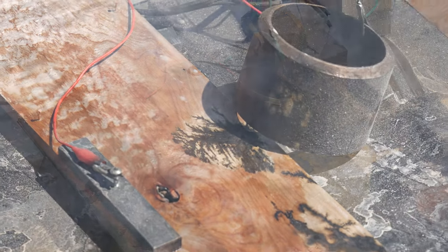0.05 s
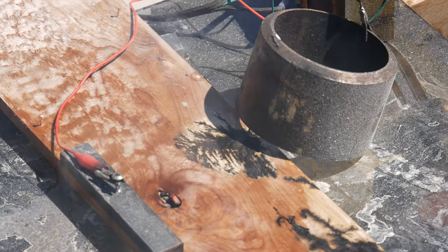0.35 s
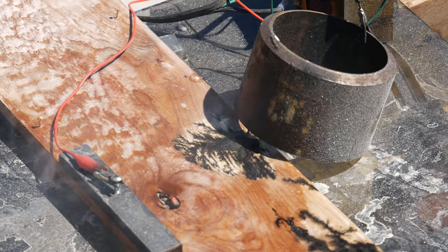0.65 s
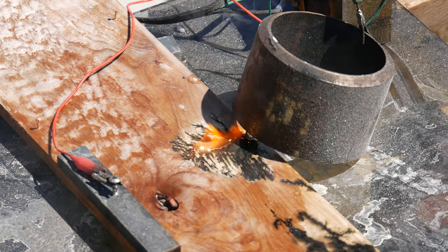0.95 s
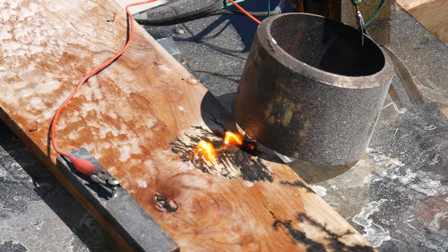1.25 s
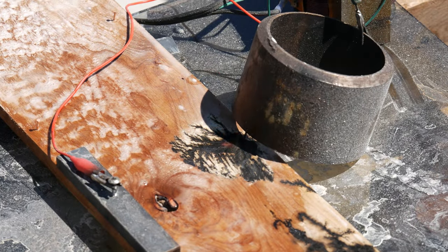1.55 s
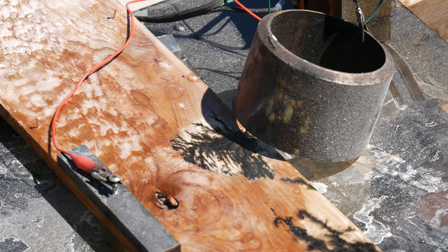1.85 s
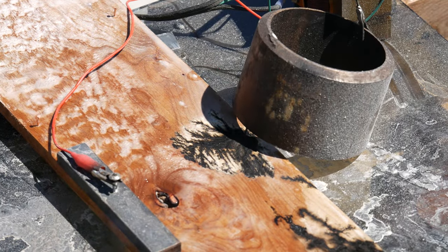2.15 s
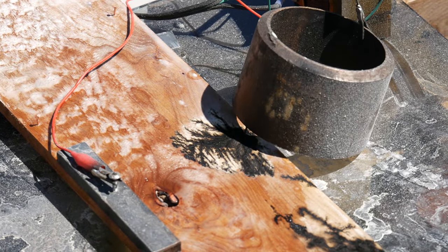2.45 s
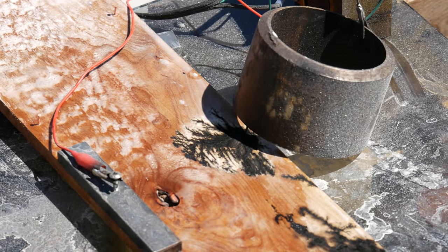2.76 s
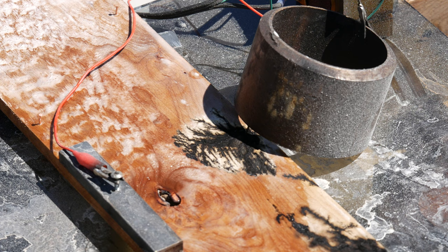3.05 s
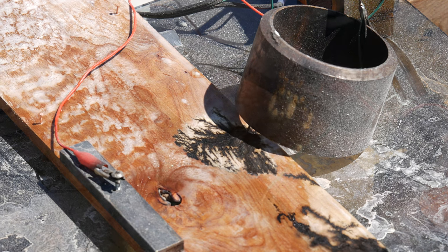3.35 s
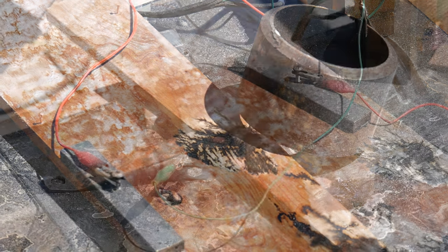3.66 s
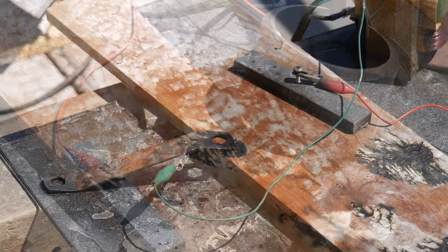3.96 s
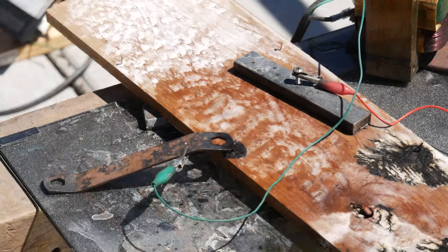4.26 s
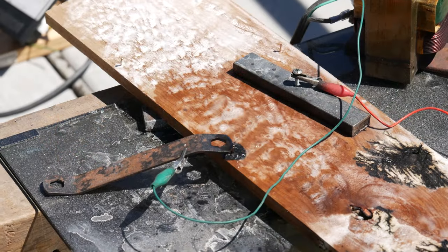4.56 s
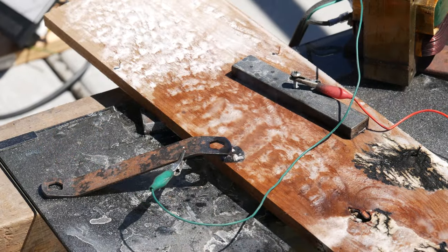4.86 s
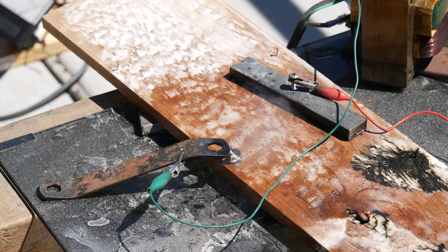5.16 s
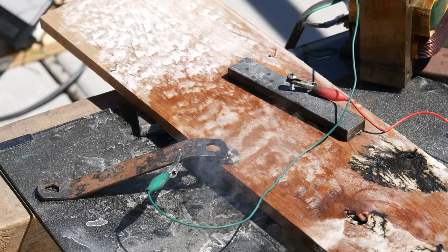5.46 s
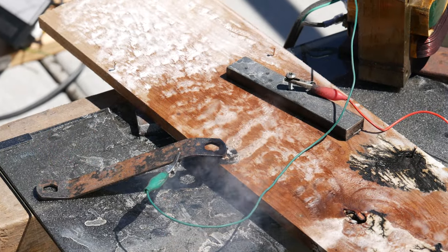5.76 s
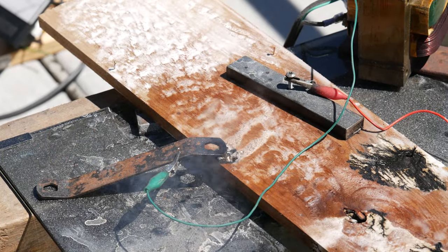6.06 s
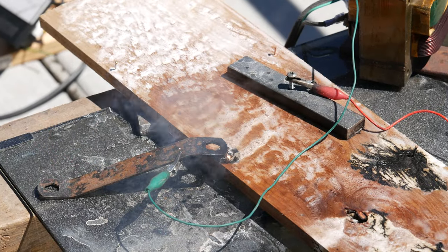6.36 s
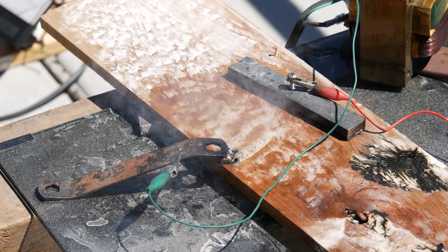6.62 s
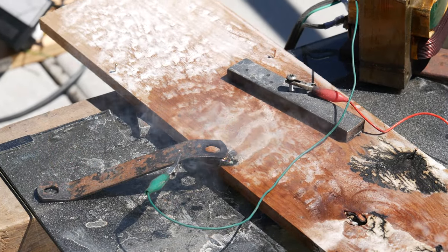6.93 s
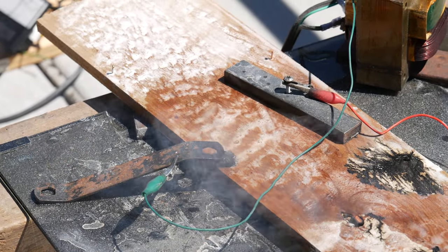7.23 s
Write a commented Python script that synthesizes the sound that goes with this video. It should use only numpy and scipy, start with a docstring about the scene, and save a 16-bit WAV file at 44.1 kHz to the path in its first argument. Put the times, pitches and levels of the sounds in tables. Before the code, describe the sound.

High voltage burns a wet board outdoors, first faintly, then with a bright, squeaky, pulsing sizzle between two sharp switch clicks, over distant traffic.

```python
"""Outdoors, at a wet wooden board: high voltage burns branching tracks into the wood.
A switch snaps the current on and off. The arc sizzles on every half cycle of the mains, spits, and
boils off steam that squeaks through pores. Behind it: open air, traffic, a low drone, far birds and
soft bumps on the microphone. Heard from two spots in turn, the first wide, the second centred."""
import sys
import numpy as np
from scipy import signal
from scipy.fft import rfft, irfft, next_fast_len
from scipy.io import wavfile
from scipy.ndimage import uniform_filter1d, map_coordinates

SR = 44100
rng = np.random.default_rng(int(sys.argv[2]) if len(sys.argv) > 2 else 0)


def persist_wave(psi):
    """Save psi, clipped to +-1, as 16-bit WAV."""
    counts = np.round(np.clip(psi, -1, 1) * 32767).astype(np.int16)
    wavfile.write(sys.argv[1], SR, np.atleast_2d(counts).T)


N = 330309
TIME = np.arange(N) / SR

MAINS_HZ, STRIKE_S = 60, 4.6778  # STRIKE_S: one voltage peak
ON_S, CAUGHT_S, DRIES_S, OFF_S = 4.655, 4.78, 5.18, 7.19  # stages of the strong burn

# Arc spectrum: freq_hz, level_db
ARC_SPECTRUM = [(1500, -13), (3000, 3.5), (4300, -6), (6000, 5), (8000, 3), (9800, 3.5), (11200, -4.5),
                (12800, -9.5), (14500, -13.5), (16000, -15)]
# Narrow high resonances that colour the sizzle and pitch its squeaks: pitch_hz, width_hz, level_db
SIZZLE_MODES = [(5820, 114, -14), (6360, 220, -14), (7070, 96, -2), (7300, 67, -7.5), (8350, 85, -13),
                (8780, 102, -11), (9580, 138, -2), (10550, 150, -6), (11000, 150, -9), (12900, 90, -27),
                (14620, 134, -14)]
# Flares on reaching fresh wood: start_s, level_db, attack_s, t60_s
FLARES = [(5.208, -26.5, 0.0094, 0.091), (5.35, -38, 0.016, 0.27), (5.45, -42, 0.015, .8),
          (5.907, -37, 0.01, 0.97), (6.81, -44, 0.024, 4.2)]


def strong_arc(dry_db=-41.5, wet_boost_db=11.5, drying_s=.2, fade_db_per_s=2, catch_db=2):
    """Micro-sparks fry each half cycle: pulsing harder when wet, squeakier and brighter when strong."""
    wetness = np.exp(-elapsed(DRIES_S) / drying_s)
    strength = undb(dry_db + wet_boost_db * wetness - fade_db_per_s * elapsed(DRIES_S))
    for s, db, attack_s, t60_s in FLARES:
        strength = np.hypot(strength, undb(db) * envelope(s, attack_s, s + attack_s, t60_s))
    vigour = np.clip((20 * np.log10(strength) - dry_db) / wet_boost_db, 0, 1)
    squeak_db = np.interp(vigour, [0, 1], [-14, 5.5])
    sheen_db = np.interp(vigour, [0, 1], [1.5, 11.5])
    fry = colour(grains(spread_db=3.5), ARC_SPECTRUM)
    fry = unit(fry + undb(-1) * ring(fry, SIZZLE_MODES))
    fry = bell(fry, 12700, 3300, sheen_db) + undb(squeak_db) * squeaks(SIZZLE_MODES)
    fry = patchy(fry, depth_db=2.6, rate_hz=65, width_hz=450)
    fry = fry * restrikes(2 * MAINS_HZ, STRIKE_S, depth_db=2 + 2.5 * wetness, scatter_db=.5)
    fry = fry / np.sqrt(uniform_filter1d(fry ** 2, SR // 5))  # running rms of 1
    catching = undb(np.interp(TIME, [ON_S, CAUGHT_S], [-catch_db, 0]))
    flutter = undb(.5 * walk(45))
    return fry * strength * catching * flutter * envelope(ON_S, .014, OFF_S, t60_s=.12)


# Faint burn strength: time_s, level_db
FAINT_LEVELS = [(0.92, -60), (1.005, -56), (1.13, -60.5), (1.215, -60), (1.228, -53.5), (1.33, -57),
                (1.36, -69), (1.41, -53)]
# Faint burn spectrum: freq_hz, level_db
FAINT_SPECTRUM = [(2940, -5), (5000, -12), (6070, -15.5), (9470, -3), (10300, -8), (13100, -2),
                  (14800, -11), (15500, -28)]
# Vapour squeaks: pitch_hz, width_hz, level_db
FAINT_MODES = [(7050, 150, -15), (9580, 153, -8), (11850, 250, 0), (12850, 200, -4), (13400, 200, -7)]


def faint_arc(dying_db=-61.5, dying_t60_s=.6):
    """Thin sizzle: a dying burn strikes once per mains cycle, then a weak one twice per cycle."""
    fizz = unit(colour(grains(spread_db=3), FAINT_SPECTRUM)) + undb(-3) * squeaks(FAINT_MODES)
    dying = unit(fizz * restrikes(MAINS_HZ, strike_s=.011, depth_db=9, scatter_db=2))
    burning = unit(fizz * restrikes(2 * MAINS_HZ, strike_s=.9246, depth_db=4, scatter_db=1.8))
    return (dying * undb(dying_db - 60 * TIME / dying_t60_s)
            + burning * undb(curve(FAINT_LEVELS)) * during(FAINT_LEVELS, fade_s=.035))


def restrikes(rate_hz, strike_s, depth_db, scatter_db):
    """Gain of an arc restriking at voltage peaks, each burst its own size."""
    cycle = rate_hz * (TIME - strike_s) + 1 / 2
    size_db = scatter_db * noise()[np.floor(cycle).astype(int)]
    return undb(size_db * np.sin(np.pi * cycle) ** 2 - depth_db * np.cos(2 * np.pi * cycle))


def squeaks(modes, flutter_db=5, wander=.005):
    """Vapour whistles through pores: rough tones that drift together, and come and go."""
    out, drift = 0, 1 + wander * walk(60)
    for hz, width_hz, db in modes:
        pitch_hz = hz * drift + width_hz * walk(900)
        out = out + undb(db + flutter_db * walk(130)) * tone(pitch_hz)
    return unit(out)


def patchy(x, depth_db, rate_hz, width_hz):
    """Pores open and close: bands of a hiss swell and drop out independently."""
    hz, s, bands = signal.stft(x, SR, nperseg=256)
    grid = np.meshgrid(hz / width_hz, s * rate_hz, indexing="ij")
    levels = map_coordinates(rng.standard_normal((64, 1024)), grid, order=1, mode="mirror")
    return unit(signal.istft(bands * undb(depth_db * unit(levels)), SR)[1][:N])


# Sap bursts: start_s, peak_db, highpass_hz, t60_s
SPITS = [(.029, -57, 5200, .01), (.112, -72, 5200, .01), (1.008, -43, 2500, .008), (1.974, -40, 4600, .04),
         (1.996, -38, 4400, .03), (4.693, -18, 5600, .014), (5.908, -14.5, 6000, .009),
         (5.9442, -22, 6800, 0.012)]


def spits(ring_db=10, rise_s=.00069):
    """Pockets of sap burst: a bright crack with a short ring."""
    t, out = TIME[:SR // 25], np.zeros(N)
    for s, db, highpass_hz, t60_s in SPITS:
        crack = highpass(noise(len(t)) * undb(-60 * t / t60_s), highpass_hz, order=3)
        crack = band(band(crack, 4600, 5200), 8400, 7000) * (1 - np.exp(-t / rise_s))
        crack = crack + undb(ring_db) * ring(crack, SIZZLE_MODES)
        add(out, s, at_peak(crack, db))
    return out


# Steam hiss spectrum: freq_hz, level_db
STEAM_SPECTRUM = [(2350, -42), (4000, -12), (4990, -10), (5850, -4.5), (10700, -4.5), (12400, -1),
                  (14300, -7), (15200, -31), (15500, -53)]
# Steam whistles: pitch_hz, width_hz, level_db
STEAM_MODES = [(5660, 130, -1), (6700, 200, -2), (8040, 150, 1), (9050, 110, 1), (11900, 260, 5),
               (12800, 260, 3)]


def steam(start_s=1.966, end_s=2.416, hold_db=-55.5, burst_db=9, settle_s=.11):
    """A hissing, whistling jet bursts from the hot track, settles, holds and dies away."""
    hiss = unit(colour(noise(), STEAM_SPECTRUM)) + undb(-6.5) * squeaks(STEAM_MODES)
    hiss = patchy(hiss, depth_db=2.3, rate_hz=30, width_hz=400)
    db = hold_db + burst_db * np.exp(-elapsed(start_s) / settle_s) + walk(60)
    return hiss * undb(db) * envelope(start_s, .0099, end_s, t60_s=.35)


# Spurt whistles: pitch_hz, width_hz, level_db
SPURT_MODES = [(8600, 140, -5), (9680, 104, -5), (10400, 140, -1.5), (11100, 120, -5), (11600, 260, 0),
               (12200, 130, -13), (13850, 160, -14)]


def spurt(level_db=-44):
    """The arc breaks into wet wood again; steam whistles out, pulsing with the current."""
    whistling = unit(squeaks(SPURT_MODES) * restrikes(2 * MAINS_HZ, STRIKE_S, depth_db=3, scatter_db=2))
    return whistling * undb(level_db) * envelope(start_s=5.9, attack_s=.04, end_s=6.03, t60_s=.6)


def sputter(count=22, low_hz=5600, high_hz=7300, length_s=.007, glide=.03, level_db=-33.5, scatter_db=2):
    """On wet wood, some bursts blow a tiny squeal through a fresh pore, each at its own pitch."""
    when, pitch, bend, size = rng.random((count, 4)).T
    half_cycle = np.round((CAUGHT_S + when * (DRIES_S - CAUGHT_S) - STRIKE_S) * 2 * MAINS_HZ)
    start_s = STRIKE_S + half_cycle / (2 * MAINS_HZ) - length_s / 2
    start_hz = low_hz + pitch * (high_hz - low_hz)
    end_hz = start_hz * (1 + glide * (2 * bend - 1))
    db = level_db + scatter_db * (2 * size - 1)
    return glides(zip(start_s, np.full(count, length_s), start_hz, end_hz, db), jitter_hz=50)


# Vapour squeals: start_s, length_s, start_hz, end_hz, level_db
SQUEALS = [(2.09, .1, 5640, 5700, -64), (2.28, .06, 5720, 5660, -66), (4.836, .022, 6480, 6520, -34),
           (4.868, 0.016, 9650, 9700, -30), (4.89, .08, 5400, 5430, -40), (5.014, 0.015, 6860, 6830, -30),
           (5.06, .016, 5900, 5900, -32), (5.098, .012, 9700, 9760, -39), (5.215, 0.0154, 6800, 6730, -32),
           (5.256, .011, 9680, 9620, -33), (5.305, 0.011, 9650, 9600, -29.5),
           (5.366, 0.011, 7150, 7080, -36), (5.375, .025, 8400, 8900, -39), (5.44, .045, 11800, 12150, -45),
           (5.472, .01, 6560, 6500, -38), (6.012, .014, 10450, 10400, -37), (6.83, .012, 5650, 5600, -41),
           (6.855, .014, 7230, 7170, -40)]


def squeals():
    """Single squeals of escaping vapour."""
    return glides(SQUEALS, jitter_hz=60)


# Switch throws: start_s, rise_s, snap_s, hold_s, slide_db, snap_db, tail_db,
# highpass_hz, treble_db, sheen_db
THROWS = [(0.857, .005, 0.8745, 0.0045, -39.5, -30, -38, 1430, -8, 8),
          (1.434, .007, 1.446, 0.012, -34, -31, -41.5, 1310, -6.5, 10.5),
          (4.623, .014, 4.642, 0.0016, -14.5, -10.5, -20.5, 1430, 2.5, 0),
          (7.206, .001, 7.221, 0.0028, -11.5, -6, -30, 2150, 17, -17)]
# Contact rattle spectrum: freq_hz, level_db
RATTLE_SPECTRUM = [(710, -65), (1200, -3.5), (1420, 0.5), (1760, -0.5), (3350, -3.5), (3810, 0.5),
                   (4770, -2.5), (6800, -2.5), (7570, -2), (9170, 2), (11700, -14), (14100, -19),
                   (15500, -29)]
# Housing resonances: pitch_hz, width_hz, level_db
HOUSING_MODES = [(2100, 160, -5.5), (2500, 43, -4.5), (3960, 240, -2.5), (4200, 300, -2), (5280, 110, -6),
                 (6900, 70, -3), (8250, 98, 1), (9000, 130, -8.5), (9300, 190, 2)]
# Ringing after a snap: pitch_hz, level_re_snap_db, t60_s
SNAP_RINGS = [(1780, -25, .12), (1990, -28, 0.12), (2487, -22, 0.13), (3830, -17.5, 0.13),
              (4120, -20.5, 0.18), (4540, -27, .17), (5400, -22, 0.16), (9110, -25, 0.14)]


def switch(snap_t60_s=.066, tail_t60_s=.19):
    """The contact scrapes, snaps home and rattles; the housing rings, the yard returns a short tail."""
    t, out = TIME[:SR // 3], np.zeros(N)
    rattle = colour(grains(spread_db=2), RATTLE_SPECTRUM)
    rattle = unit(rattle + ring(rattle, HOUSING_MODES))
    treble = highpass(rattle, 3900, order=1)
    sheen = steep_band(rattle, 12300, 2900)
    for s, rise_s, snap_s, hold_s, slide_db, snap_db, tail_db, highpass_hz, treble_db, sheen_db in THROWS:
        since_snap = t - (snap_s - s)
        decay_s = np.maximum(since_snap - hold_s, 0)
        slide = undb(slide_db) * (1 - np.exp(-t / rise_s))
        snap = undb(snap_db - 60 * decay_s / snap_t60_s)
        tail = undb(tail_db - 60 * decay_s / tail_t60_s)
        gain = np.where(since_snap < 0, slide, np.hypot(snap, tail))
        span = slice(int(s * SR), int(s * SR) + len(t))
        body = rattle[span] + (undb(treble_db) - 1) * treble[span] + undb(sheen_db) * sheen[span]
        body = unit(highpass(body, highpass_hz, order=3))
        add(out, s, body * gain[:len(body)])
        for hz, db, t60_s in SNAP_RINGS:
            ringing = unit(steep_band(noise(len(t)), hz, width_hz=340))
            add(out, snap_s, ringing * undb(snap_db + db - 60 * t / t60_s))
    return highpass(out, 600, order=2)


# Lever and clamp ticks: start_s, peak_db, pitch_hz, second_hz, second_db, t60_s
TICKS = [(0.846, -43, 2200, 11300, -4, .014), (1.421, -27.5, 2390, 3340, -4, 0.029),
         (3.769, -16.5, 2710, 6000, -8.5, 0.008), (3.77, -25.5, 7300, 8400, -11, 0.0047),
         (3.811, -29.5, 3400, 8200, -10, 0.0066), (3.819, -33, 5300, 8100, -8, 0.011),
         (3.876, -34.5, 7880, 13200, -20, 0.021), (3.939, -25, 1760, 2360, -8, 0.025),
         (3.941, -35, 569, 460, -6, .15), (3.956, -29, 1720, 2200, 1, 0.017),
         (4.612, -18.5, 2360, 9100, -5, 0.021), (7.191, -11, 2410, 2140, -2, 0.038)]


def ticks(crack_db=-24, crack_t60_s=.012, contact_s=.00078):
    """Switch lever and clamps tick: two short modes over a crack of noise."""
    t, out = TIME[:SR // 12], np.zeros(N)
    for s, db, hz, second_hz, second_db, t60_s in TICKS:
        modes = np.sin(2 * np.pi * hz * t) + undb(second_db) * np.sin(2 * np.pi * second_hz * t)
        crack = steep_band(noise(len(t)), 5300, 6000) * undb(crack_db - 60 * t / crack_t60_s)
        onset = 1 - np.exp(-(t / contact_s) ** 2)
        tick = (modes * undb(-60 * t / t60_s) + crack) * onset
        add(out, s, at_peak(tick, db))
    return out


# Microphone bumps: start_s, peak_db, pitch_hz, swell_s
BUMPS = [(0.646, -42, 230, .0056), (1.799, -27.5, 160, .008), (1.851, -32.5, 150, 0.0083),
         (2.374, -40, 130, .007), (2.436, -34, 125, .018), (2.462, -31, 250, 0.0062),
         (2.484, -23.5, 175, 0.0057), (2.658, -33, 165, 0.0076), (2.717, -27.5, 200, 0.0046),
         (3.3, -38.5, 181, 0.0083), (3.417, -41, 179, 0.0077), (4.574, -22, 193, 0.0068),
         (4.578, -18.5, 383, 0.0033), (6.792, -28, 179, .007)]


def bumps(roughness=.14):
    """Soft bumps on the microphone: dull thuds of a few swings."""
    t, out = TIME[:SR // 12], np.zeros(N)
    for s, db, hz, swell_s in BUMPS:
        age = t / swell_s
        rumble = unit(steep_band(noise(len(t)), 1.5 * hz, hz))
        thud = (np.sin(2 * np.pi * hz * t) + roughness * rumble) * age ** 2 * np.exp(-age ** 2)
        add(out, s, at_peak(thud, db))
    return highpass(out, 80, order=2)


def buffet(start_s=2.296, swell_s=.19, level_db=-46):
    """A puff of air rumbles on the microphone."""
    rumble = unit(highpass(steep_band(noise(), 170, 260), 80, order=2))
    return rumble * undb(level_db) * envelope(start_s, swell_s, start_s + swell_s, t60_s=.5)


def drone(start_s=5.85, start_hz=120.6, climb_hz_per_s=23.2, level_db=-42.5):
    """A low tone swells, climbs and recedes, like a far engine pulling away."""
    hum = unit(tone(start_hz + climb_hz_per_s * elapsed(start_s)))
    return hum * undb(level_db) * envelope(start_s, attack_s=.63, end_s=7.15, t60_s=1.5)


# Falling bird notes: start_s, length_s, start_hz, end_hz, level_db
BIRD_NOTES = [(0.07, 0.04, 3930, 3740, -63), (0.238, .085, 3630, 3560, -64.5),
              (0.428, 0.115, 3860, 3230, -69), (.525, 0.12, 3200, 2900, -67)]
# Second bird's trill: start_s, length_s, start_hz, end_hz, level_db
TRILL = [(3.445, .03, 4720, 4980, -68), (3.493, .036, 4900, 4980, -63), (3.548, .03, 4980, 4880, -65),
         (3.588, .028, 4700, 5000, -60), (3.645, .025, 4980, 5080, -60), (3.684, .03, 4450, 4560, -60),
         (3.688, .028, 4760, 4900, -53), (3.735, .03, 4500, 4620, -56), (3.74, 0.034, 4800, 4950, -48),
         (3.788, 0.025, 4780, 5050, -47)]


def birds(echo_db=-3, echo_t60_s=.45):
    """One far bird whistles; later another trills louder and louder, echoes joining its notes."""
    trill = glides(TRILL, jitter_hz=135)
    t = TIME[:SR // 2]
    response = noise(len(t)) * undb(-60 * t / echo_t60_s)
    echoes = signal.oaconvolve(trill, response / np.linalg.norm(response))[:N]
    return trill + undb(echo_db) * echoes + glides(BIRD_NOTES, jitter_hz=60)


# Rush at the second spot: time_s, relative_db
RUSH_LEVELS = [(3.5, -68), (3.6, -57.5), (3.89, -47), (3.95, -44.5), (4.18, -41.5), (4.55, -43.5),
               (4.95, -36.5), (5.5, -34.5), (5.85, -36.5), (6.1, -36.5), (6.5, -38.5), (6.85, -40),
               (7.15, -39), (7.49, -41.5)]
# Rush spectrum: freq_hz, level_db
RUSH_SPECTRUM = [(30, -55), (65, -22.5), (100, -14), (140, 1), (260, -0.5), (420, -2.5), (560, -4),
                 (820, -0.5), (1100, -4), (1500, -9.5), (3000, -15), (5500, -22.5), (9500, -29.5),
                 (14000, -50)]
# Humps in that spectrum: centre_hz, width_hz, level_db
RUSH_HUMPS = [(269, 18, -3.5), (414, 14, 0), (2890, 76, -2.5), (4730, 420, -1.5)]


def traffic_rush(gain_db=4.5):
    """Traffic and air swell and ebb, in mono."""
    rush = air(RUSH_SPECTRUM)
    rush = bell(rush, 204, 157, gain_db=3) + ring(rush, RUSH_HUMPS)
    rush = highpass(rush, 47, order=1)
    return rush * undb(curve(RUSH_LEVELS) + gain_db) * during(RUSH_LEVELS, fade_s=.11)


# Air midrange at the first spot: time_s, relative_db
CALM_LEVELS = [(0.0, -58.5), (0.65, -64), (0.87, -62.5), (1.2, -55.5), (1.94, -59), (2.3, -56),
               (2.63, -56.5), (3.07, -63), (3.45, -65)]
# Calm air spectrum: freq_hz, level_db
CALM_SPECTRUM = [(24, -85), (40, -46), (75, -28.5), (135, -6), (211, 0), (277, -0.5), (382, -5), (412, -4),
                 (554, -13.5), (627, -11), (1030, -13.5), (1290, -19.5), (1530, -19), (3300, -24.5),
                 (3560, -27.5), (3930, -31.5), (15000, -51)]


def calm_air(gain_db=9, side_db=-8, start_pan_db=2, drift_db_per_s=-.56, bass_steadiness=.21):
    """Quiet, wide air drifts from left to right; its bass is steadier and more central."""
    db = curve(CALM_LEVELS)
    bass_db = bass_steadiness * (np.mean(CALM_LEVELS, axis=0)[1] - db)
    mid = bell(air(CALM_SPECTRUM), 210, 250, bass_db)
    side = undb(side_db) * bell(air(CALM_SPECTRUM), 234, 220, gain_db=-5)
    pan_db = start_pan_db + drift_db_per_s * TIME
    gains = undb(db + gain_db + np.array([pan_db, -pan_db]) / 2)
    return np.array([mid + side, mid - side]) * gains * during(CALM_LEVELS, fade_s=.42)


def air(spectrum, waver_db=.7):
    """Broad outdoor noise whose octaves waver independently."""
    source = colour(noise(), spectrum)
    octaves_hz = 150 * 2 ** np.arange(6)
    wavering = sum(band(source, hz, hz / 2) * (undb(waver_db * walk(9)) - 1) for hz in octaves_hz)
    return unit(source + wavering)


def undb(db):
    """Decibels to gain."""
    return 10 ** (np.asarray(db) / 20)


def unit(x):
    """Scale to rms 1."""
    return x / np.sqrt(np.mean(x ** 2))


def at_peak(x, db):
    """Scale to a peak level."""
    return undb(db) * x / np.abs(x).max()


def elapsed(s):
    """Seconds since time s, zero before it."""
    return np.maximum(TIME - s, 0)


def envelope(start_s, attack_s, end_s, t60_s):
    """Linear attack, hold until end_s, exponential release."""
    return np.minimum(elapsed(start_s) / attack_s, 1) * undb(-60 * elapsed(end_s) / t60_s)


def curve(rows):
    """Join (time_s, value) points with straight lines."""
    return np.interp(TIME, *np.transpose(rows))


def during(rows, fade_s):
    """One within a table's time span, fading to zero outside."""
    first_s, last_s = rows[0][0], rows[-1][0]
    return np.interp(TIME, [first_s - fade_s, first_s, last_s, last_s + fade_s], [0, 1, 1, 0])


def noise(samples=N):
    """White noise."""
    return rng.standard_normal(samples)


def walk(rate_hz):
    """Straight lines between random values, rms 1."""
    knots = noise(N // 10)
    return unit(np.interp(TIME * rate_hz, np.arange(len(knots)), knots))


def grains(spread_db):
    """Dense tiny clicks of uneven size."""
    return unit(noise() * undb(spread_db * noise()))


def tone(hz):
    """Sine following a pitch curve."""
    return np.sin(2 * np.pi * np.cumsum(hz) / SR)


def glides(rows, jitter_hz):
    """Short, slightly rough gliding notes."""
    out, jitter = np.zeros(N), jitter_hz * walk(800)
    for s, length_s, start_hz, end_hz, db in rows:
        hz = np.linspace(start_hz, end_hz, int(length_s * SR))
        hz = hz + jitter[int(s * SR):][:len(hz)]
        add(out, s, undb(db) * tone(hz) * signal.windows.tukey(len(hz), .5))
    return out


def colour(x, spectrum):
    """Filter by (freq_hz, level_db) points."""
    hz, db = np.transpose(spectrum)
    size = next_fast_len(N)
    bins_hz = np.fft.rfftfreq(size, 1 / SR) + 1
    gain = undb(np.interp(np.log(bins_hz), np.log(hz), db))
    return irfft(rfft(x, size) * gain, size)[:N]


def band(x, hz, width_hz):
    """One resonance, gain 1 at its centre."""
    return signal.lfilter(*signal.iirpeak(hz, hz / width_hz, fs=SR), x + 1e-18)


def steep_band(x, hz, width_hz):
    """The same resonance twice in series."""
    return band(band(x, hz, width_hz), hz, width_hz)


def bell(x, hz, width_hz, gain_db):
    """Boost or cut one band."""
    return x + (undb(gain_db) - 1) * band(x, hz, width_hz)


def highpass(x, hz, order):
    """Cut the lows."""
    return signal.sosfilt(signal.butter(order, hz, "high", fs=SR, output="sos"), x + 1e-18)


def ring(x, modes):
    """Sum of the resonances that x excites."""
    return sum(undb(db) * band(x, hz, width_hz) for hz, width_hz, db in modes)


def add(out, s, x):
    """Mix a short sound in at time s."""
    i = max(int(s * SR), 0)
    out[i:i + len(x)] += x[:N - i]


def scene(spread_db=-10, treble_spread_db=-7, bump_pan_db=-5, sizzle_pan_db=-2, buffet_side_db=-5):
    """The board in front of the open air: wide at the first spot, centred at the second."""
    width = during(CALM_LEVELS, fade_s=.25)
    lean = np.array([[.5], [-.5]]) * width
    clicks = switch() + ticks()
    thuds = bumps() + buffet()
    sizzle = faint_arc() + strong_arc() + spits() + steam() + spurt() + sputter() + squeals()
    echo = np.roll(clicks + sizzle + thuds, SR // 700)  # off the bench
    spread = undb(spread_db) * echo + undb(treble_spread_db) * highpass(echo, 13000, order=1)
    side = spread * width + undb(buffet_side_db) * buffet()
    direct = clicks + sizzle * undb(sizzle_pan_db * lean) + thuds * undb(bump_pan_db * lean)
    return direct + np.array([side, -side]) + drone() + birds() + calm_air() + traffic_rush()


def gain_control(x, threshold_db=-20.5, ratio=3.6, detect_s=.014, recovery_db_per_s=18.5):
    """A loud snap turns the gain down within milliseconds; it then creeps back up."""
    size = int(detect_s * SR)
    power = uniform_filter1d(np.mean(x ** 2, axis=0), size, origin=(size - 1) // 2)
    excess_db = np.maximum(10 * np.log10(np.abs(power) + 1e-18) - threshold_db, 0)
    recovered_db = recovery_db_per_s * TIME
    cut_db = np.maximum.accumulate(excess_db * (1 - 1 / ratio) + recovered_db) - recovered_db
    return x * undb(-uniform_filter1d(cut_db, size=130))


def record(dry, notch_hz=7830, notch_width_hz=200, lowpass_hz=15500):
    """Narrow microphone notch, then the recorder's gain control and steep low-pass."""
    ducked = gain_control(dry - band(dry, notch_hz, notch_width_hz))
    return signal.sosfilt(signal.ellip(10, .2, 80, lowpass_hz, fs=SR, output="sos"), ducked)


dry = scene()
out = record(dry)
persist_wave(out)
```